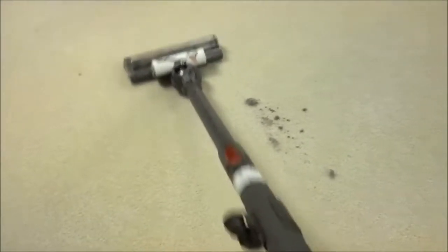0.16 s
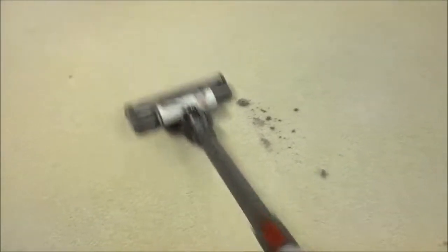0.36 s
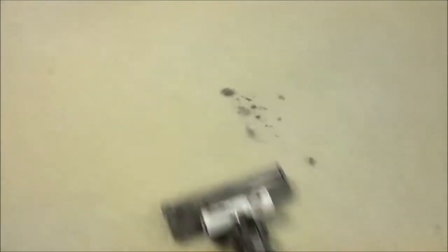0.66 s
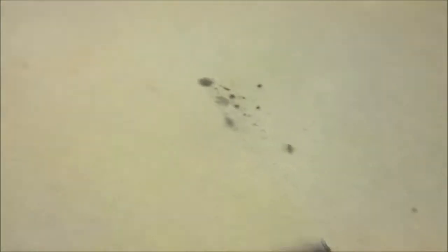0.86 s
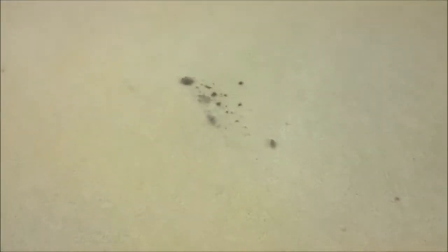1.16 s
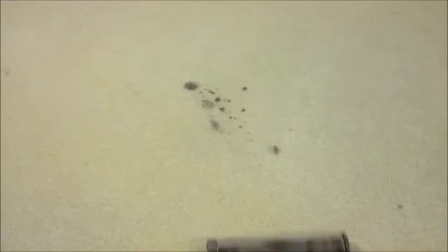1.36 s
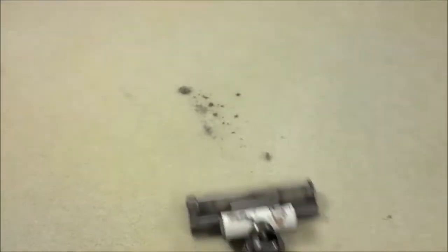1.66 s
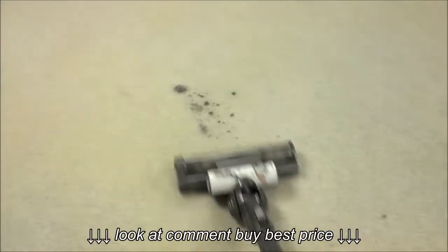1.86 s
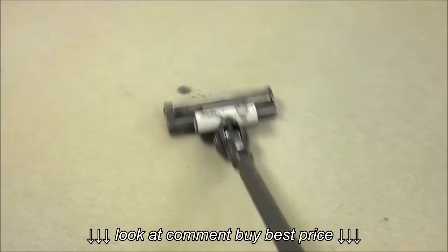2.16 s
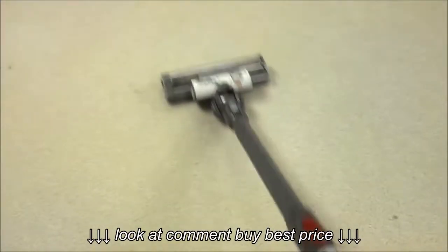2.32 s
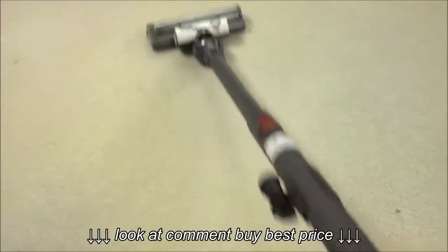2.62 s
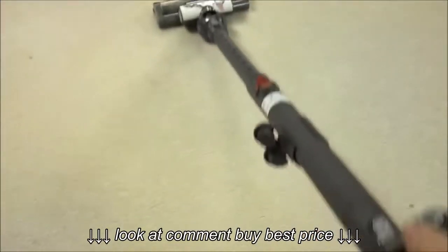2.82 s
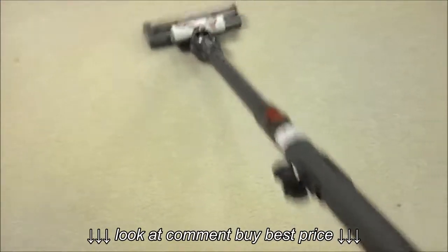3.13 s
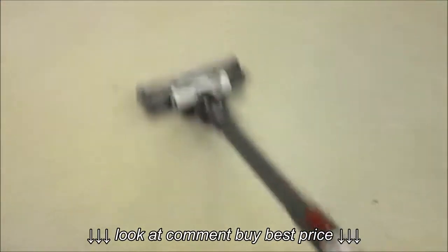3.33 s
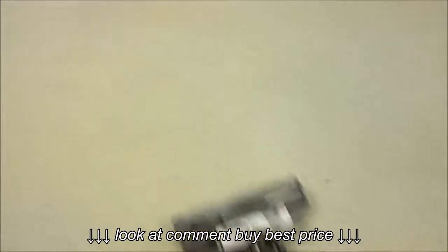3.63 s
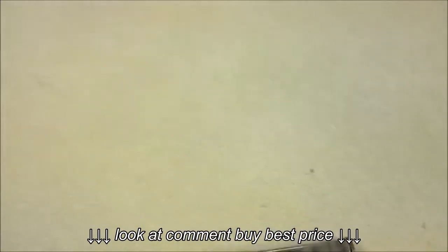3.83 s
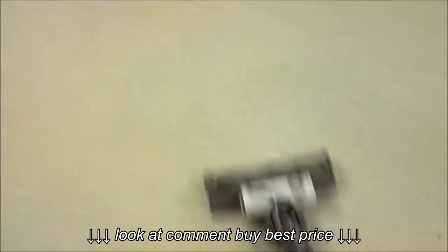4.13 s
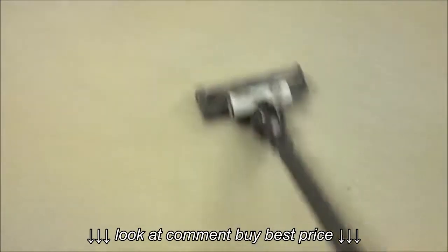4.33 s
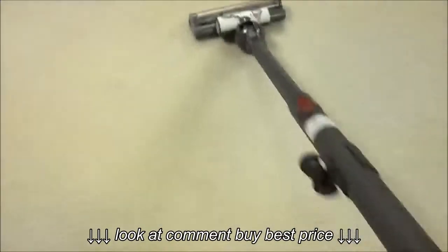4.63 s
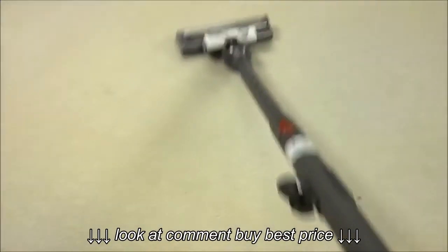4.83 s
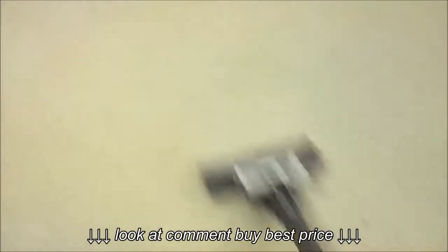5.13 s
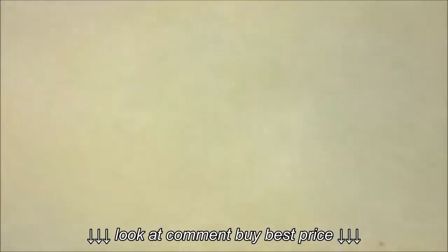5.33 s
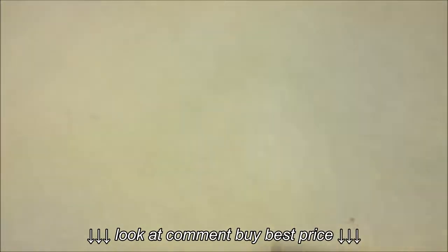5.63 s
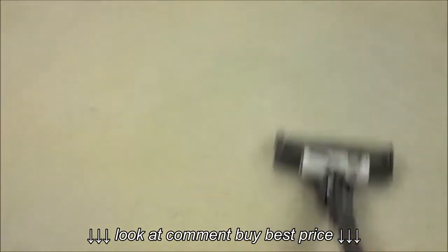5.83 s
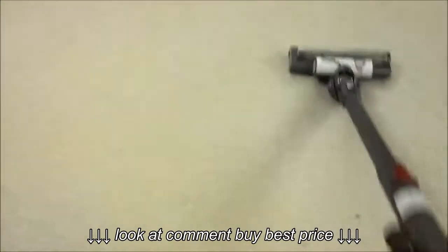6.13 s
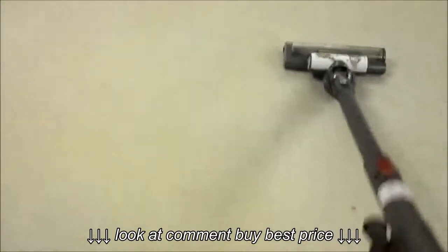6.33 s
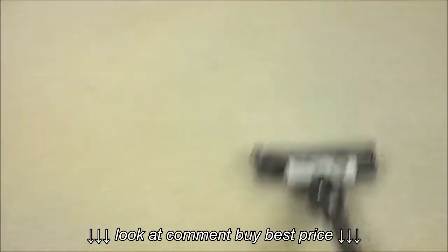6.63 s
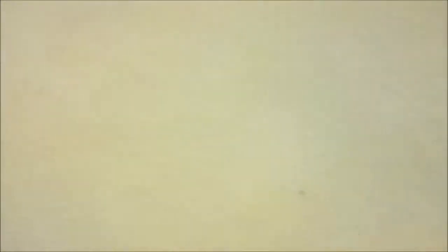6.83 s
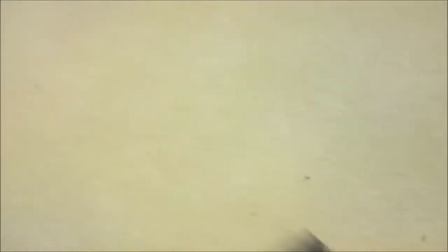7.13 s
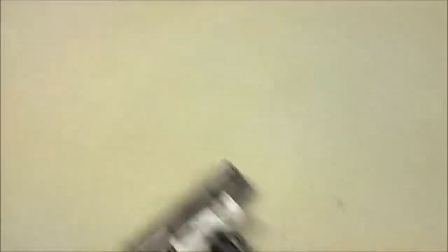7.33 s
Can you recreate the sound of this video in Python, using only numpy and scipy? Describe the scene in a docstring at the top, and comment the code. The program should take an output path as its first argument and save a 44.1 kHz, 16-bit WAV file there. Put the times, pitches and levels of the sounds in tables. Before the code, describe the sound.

Close vacuuming of carpet in a small room: steady airy roar, wavering whistle, a brief rattle of picked-up dirt, and plastic chatter at the end.

```python
"""A canister vacuum cleaner works a carpet in a small room, the floor tool pushed and pulled close to the microphone.
From the start the motor hums and whines in tones, shaped noise rushes and hisses, and a thin whistle glides.
Near 0.2, 3.2 and 6.7 s short side tones of the whistle, sines below or above its main pitch, glide as well.
From 2.1 s crumbs patter and lumps knock in the tool; from 3.0 s grit ticks in the wand: cracks and ringing modes.
At 7.0 s, close to the microphone, the tool chatters on the carpet as it is turned; air and motor run to the end."""
import sys
import numpy as np
from scipy import signal
from scipy.fft import rfft, irfft, next_fast_len
from scipy.io import wavfile
from scipy.ndimage import uniform_filter1d

SR = 44100
rng = np.random.default_rng(int(sys.argv[2]) if len(sys.argv) > 2 else 0)


def master(y):
    """Save y as 16-bit WAV."""
    cut = np.clip(np.atleast_2d(y).T, -1, 1)
    pcm = np.round(cut * 32767)  # scale
    wavfile.write(sys.argv[1], SR, pcm.astype(np.int16))


N = 329427
T = np.arange(N) / SR  # time of each sample [s]

# The arm's strokes: (time [s], distance of the floor tool [0 drawn close, 1 at arm's length])
TOOL_REACH = [(-0.0, 0.85), (0.29, 0.88), (0.74, 0.34), (1.04, 0.17), (1.6, 0.35), (1.95, 0.52),
              (2.34, 0.7), (2.96, 0.97), (3.27, 0.79), (3.6, 0.35), (4.09, 0.24), (4.35, 0.79),
              (4.76, 0.84), (5.09, 0.66), (5.34, 0.2), (5.56, 0.04), (5.67, 0.44), (6.14, 0.81),
              (6.59, 0.69), (6.8, 0.24), (7.02, 0.042), (7.47, 0.39)]
ARM_EASE_S = 0.118  # averaging time that rounds the strokes
PULL_REACH_PER_S = 1  # speed of a brisk pull

# Strength of the suction, before the stroke and each band of air noise shift it: (time [s], level [dB])
SUCTION_LEVEL = [(.05, -34), (.5, -31.5), (.85, -33), (.96, -30.5), (1.08, -33.5), (1.36, -34), (1.75, -33),
                 (2.16, -31.5), (2.96, -35), (3.48, -31), (3.95, -33), (4.14, -36), (4.6, -36),
                 (4.9, -34.5), (5.12, -30.5), (5.33, -32), (5.54, -32.5), (5.74, -35.5), (6.2, -34.5),
                 (6.4, -36.5), (6.64, -33.5), (7.1, -31.5), (7.2, -33.5), (7.45, -34.5)]
# The tool rocks as a stroke turns round and the air noise dips: (time [s], dip [dB], a rise if negative)
STROKE_TURNS = [(.28, 4), (2.78, -0.5), (4.67, 2.5), (6.25, 1.5), (7.12, 1)]
TURN_DROP_S, TURN_RECOVER_S = 0.0054, 0.16  # length of the drop; time constant of the recovery
# The tool clings to the carpet, hardest on the first two pulls, and its wide gap swells:
# (time [s], half length [s], swell [dB])
CARPET_CLINGS = [(.41, 0.28, 5), (3.28, 0.27, 5), (6.2, 0.49, 1)]

# Relative spectra of the low, middle and high air noise: (frequency [Hz], density [dB per Hz])
ROAR_SPECTRUM = [(25, -29), (65, -26), (105, -15.5), (145, -15), (175, -8), (220, -7), (262, -3),
                 (305, -4.5), (370, -0.5), (550, 0.5), (660, -5.5), (1100, -11.5), (3000, -34)]
RUSH_SPECTRUM = [(300, -31), (620, -14), (800, -0.5), (980, -0.5), (1150, 0), (1350, 0.5), (1700, 0.5),
                 (2050, 1), (2350, -2.5), (2600, 1.5), (2900, -8), (3800, -22), (6000, -22)]
EDGE_SPECTRUM = [(1200, -21), (2600, -5.5), (3050, -2), (3500, 2), (4200, 1), (5100, -2), (6500, -3),
                 (7700, -5.5), (10500, -3.5), (11700, -4), (16000, -3.5)]

# Jets in the tool's wide, middle and fine gaps, beaming in lobes that sweep past as the tool travels:
# (centre at the lobe's reach [Hz], width [Hz], level on a lobe with the tool close [dB], reach of that lobe [0-1],
#  reach between lobes [0-1 scale], drop between lobes [dB], rise at arm's length [dB], fall per unit of reach [Hz])
GAP_JETS = [(8905, 2200, -41, 0.75, 1.74, 13.5, 3, 200), (13280, 1850, -37.5, 0.77, 0.75, 10.5, 5, 600),
            (15300, 1400, -35, 0.34, 0.69, 11, 1, 200)]

WAND_CLOSE_DB, WAND_FAR_DB = -36.5, -16.5  # level with the tool drawn close; change at arm's length
DUCT_ECHO_S = .0017  # delay along the duct

# Airflow whistle: (time [s], pitch [Hz], level [dB])
WHISTLE_GLIDE = [(0, 2990, -55), (.2, 2950, -46), (.4, 2880, -53), (.8, 2840, -52), (.95, 2820, -43),
                 (1.12, 2670, -42.5), (1.25, 2730, -44.5), (1.35, 2850, -53), (1.46, 2950, -46),
                 (1.62, 3055, -42.5), (2.1, 3150, -45), (2.38, 3125, -50), (2.6, 3290, -45),
                 (2.98, 3490, -46), (3.15, 3170, -50), (3.42, 2890, -58), (3.65, 2750, -42),
                 (3.88, 2410, -43), (4.01, 2420, -42.5), (4.11, 2790, -44.5), (4.2, 2970, -50),
                 (4.33, 3080, -49.5), (4.45, 3150, -57), (4.74, 3388, -48.5), (4.95, 3178, -49),
                 (5.15, 3030, -46), (5.36, 2880, -45), (5.48, 2420, -42), (5.57, 2400, -41),
                 (5.66, 2650, -44), (5.76, 2872, -49), (6.05, 2950, -57), (6.3, 3098, -52),
                 (6.42, 3098, -43.5), (6.57, 3090, -45), (6.7, 3108, -40.5), (6.98, 3085, -43),
                 (7.1, 3090, -37), (7.2, 3095, -39.5), (7.32, 3260, -51), (7.47, 3350, -62)]
# Its partials: (multiple of the pitch, level [dB], rise per octave of pitch [dB], rise at arm's length [dB])
WHISTLE_PARTIAL_LEVELS = [(.69, -10.5, 10, 0), (1, 0, 0, 0), (2, -18, 10, 12)]
WHISTLE_JITTER = .0034  # share of the pitch, at the mean pitch
WHISTLE_FLUTTER_DB, WHISTLE_FLUTTER_HZ = 2, 130  # depth and rate of the level's flutter
WHISTLE_ROOM_DB = -15  # echo in the room, relative to the direct whistle

# The whistle's shrill mode flares up as the tool is pulled back: (time [s], half length [s], swell [dB])
SHRILL_SWELLS = [(.75, .35, 6), (3.45, .17, 9), (3.88, .15, 6), (5.32, .22, 8.5)]
SHRILL_RATIO, SHRILL_WIDTH_HZ = 3.655, 110  # multiple of the whistle's pitch; line width
SHRILL_DB = -54  # resting level
SHRILL_CEILING_HZ, SHRILL_FADE_HZ = 11500, 250  # where it dies out, and how gradually

SHAFT_HZ, SHAFT_DB = 585.2, -54.5  # mean pitch and level of the motor shaft
FAN_BLADES = 11
MAINS_HZ, HUM_DB = 60, -66
# Whine of the fan blades, before it wavers: (time [s], level [dB])
FAN_WHINE = [(0, -60), (3.3, -62), (3.8, -48), (4.3, -61), (4.8, -48.5), (5.4, -56), (6.05, -53),
             (6.4, -65), (7.47, -61)]

# Short side tones of the airflow whistle, below or above its main pitch:
# (time [s], length [s], first pitch [Hz], last pitch [Hz], level at the middle [dB])
SIDE_TONE_GLIDES = [(.22, .45, 2050, 1980, -46), (3.18, .14, 1720, 2080, -42),
                    (3.2, .24, 3480, 3830, -43.5), (3.47, .14, 3620, 3560, -46),
                    (6.66, .16, 2150, 2130, -45)]

# Modes of the plastic tool and wand, before chance scatters their levels:
# (frequency [Hz], time to fall 60 dB [s], level [dB])
PLASTIC_MODES = [(270, .045, -2), (400, .03, 1), (550, .02, -4), (760, .025, -2), (1150, .015, -4),
                 (1900, .012, -11), (3300, .008, -6), (4700, .006, -5), (5800, .006, -6)]
CRACK_S, CRACK_DB = .002, 0  # time constant of a crack; its peak relative to the ring

# The patch of crumbs: when the tool meets it, and the time to cross it
CRUMBS_FROM_S, CRUMBS_LENGTH_S = 2.08, .4
CRUMBS_DB, CRUMBS_SPREAD_DB = -32, 8  # loudest peak; spread below that
CRUMBS_HZ = 400  # softest contact pitch

# Peaks of the three tables below are before the plastic body's bass cut and the room.
# Lumps of dirt hitting the tool: (time [s], peak [dB], contact pitch, higher for a harder lump [Hz])
DIRT_LUMPS = [(2.1732, -22.5, 480), (2.1755, -28, 600), (2.191, -28, 900), (2.292, -26, 600),
              (2.296, -28, 550), (2.315, -31, 600), (2.381, -30, 650), (2.476, -20.5, 900),
              (2.4785, -25, 900), (2.4827, -17, 390)]
# Grit hitting the wand, before a common cut in scene(): (time [s], peak [dB], contact pitch [Hz])
WAND_GRIT = [(3.0294, -32, 4030), (3.5635, -15, 4460), (3.8884, -17, 3980), (3.933, -14, 2400),
             (5.128, -16, 3980), (5.3238, -30, 4000), (5.3617, -27, 3950), (6.9304, -17, 4550)]
# The tool chatters on the carpet as it is turned: (time [s], peak [dB], contact pitch [Hz])
TOOL_CHATTER = [(7.0166, -22, 4500), (7.034, -24, 4300), (7.0515, -22, 4500), (7.0869, -20.5, 4300),
                (7.1049, -18.5, 3800), (7.114, -24, 3200)]

ROOM_DB, ROOM_T60_S = -16, .2  # level of the blows' room tail; its time to fall 60 dB
TOP_HZ = 15720  # upper edge of the recorder's band


def undb(db):
    """Decibels to gain."""
    return 10 ** (np.asarray(db) / 20)


def curves(table):
    """The columns of a table as one value per sample."""
    s, *columns = np.transpose(table)
    return [np.interp(T, s, column) for column in columns]


def walk(hz):
    """Slow chance: random levels held and slewed twice, spread near 1."""
    hold = max(int(SR / hz), 2)
    steps = np.repeat(rng.standard_normal(N // hold + 1), hold)
    return 1.3 * uniform_filter1d(uniform_filter1d(steps, hold), hold)[:N]


def swells(table):
    """Decibels gained in smooth bell-shaped swells."""
    return sum(db * np.exp(-((T - s) / half_s) ** 2) for s, half_s, db in table)


def noise(gain_at):
    """Noise of rms 1 with the given gain over frequency."""
    size = next_fast_len(N, True)
    f = np.maximum(np.arange(size // 2 + 1) * SR / size, 1)
    x = irfft(rfft(rng.standard_normal(size)) * gain_at(f), size)[:N]
    return x / x.std()


def turbulence(spectrum):
    """Air noise of rms 1 that follows a spectrum, dying away beyond its ends."""
    hz, db = np.transpose(spectrum)

    def gain_at(f):
        ends = np.minimum(f / hz[0], 1) * np.minimum(hz[-1] / f, 1) ** 2
        return undb(np.interp(np.log(f), np.log(hz), db)) * ends

    return noise(gain_at)


def resonance(hz, width_hz):
    """Air noise ringing in one steep resonance, whose centre may move."""
    phase = 2 * np.pi * np.cumsum(np.broadcast_to(hz, N)) / SR

    def skirt(f):
        return np.exp(-(f / (2 * width_hz)) ** 4) / (1 + (2 * f / width_hz) ** 2)

    # two slow noises on carriers a quarter turn apart
    return noise(skirt) * np.cos(phase) + noise(skirt) * np.sin(phase)


def tone(hz):
    """A sine of rms 1 that follows a pitch curve."""
    return np.sqrt(2) * np.sin(2 * np.pi * (np.cumsum(hz) / SR + rng.random()))


def room(x, wet_db):
    """A short, dense tail of decaying noise from a carpeted room, added to the direct sound."""
    t = T[:SR // 3]
    tail = rng.standard_normal(len(t)) * np.exp(-np.log(1000) * t / ROOM_T60_S)
    tail *= t > .006  # the first reflections arrive late
    return x + undb(wet_db) * signal.fftconvolve(x, tail / np.linalg.norm(tail))[:N]


def suction(flow_db, cling_db, reach, roar_db=-10.0, rush_db=-3.0, edge_db=-3.0, edge_cling=0.38,
            far_db=2.5, flutter_db=0.87, roar_flutter_db=0.8):
    """Broad air noise, a little stronger with the tool flat at arm's length; the brush strip makes it flutter."""
    flutter = flutter_db * walk(45)
    level_db = flow_db + far_db * reach
    low = turbulence(ROAR_SPECTRUM) * undb(level_db + roar_db + roar_flutter_db * walk(9))
    middle = turbulence(RUSH_SPECTRUM) * undb(level_db + rush_db + flutter)
    high = turbulence(EDGE_SPECTRUM) * undb(level_db + edge_db + edge_cling * cling_db + flutter)
    return low + middle + high


def jets(reach, pull, surge_db, cling_db, flicker_db=1.36, surge_share=0.46, wide_pull_db=3.0,
         cling_steal=1.0, sag_hz_per_db=60, wander=.007):
    """Each gap hisses in its own resonance, loudest when one of its lobes points at the microphone."""
    gaps = []
    # clinging to the carpet lowers the wide gap's resonance
    sags_hz = (sag_hz_per_db * cling_db, 0, 0)
    for gap, sag_hz in zip(GAP_JETS, sags_hz):
        hz, width_hz, db, lobe, spacing, depth_db, far_db, far_hz = gap
        beam_db = far_db * reach - depth_db * np.sin(np.pi * (reach - lobe) / spacing) ** 2
        centre_hz = hz * (1 + wander * walk(5)) - sag_hz - far_hz * (reach - lobe)
        level_db = db + beam_db + surge_share * surge_db + flicker_db * walk(30)
        gaps.append(resonance(centre_hz, width_hz) * undb(level_db))
    wide, middle, fine = gaps
    # pulling and clinging send more of the air through the wide gap
    return wide * undb(cling_db + wide_pull_db * pull) + middle * undb(-cling_steal * cling_db) + fine


def wand(reach, surge_db, hz=3130, follow=.45, width_hz=1150, surge_share=1.2):
    """Air rings in the wand's bore, loudest drawn close; the resonance leans with the whistle's pitch."""
    pitch = curves(WHISTLE_GLIDE)[0]
    centre_hz = hz + follow * (pitch - pitch.mean())
    level_db = WAND_CLOSE_DB + WAND_FAR_DB * reach + surge_share * surge_db
    return resonance(centre_hz, width_hz) * undb(level_db)


def duct(x, echo_db=-20):
    """A weak echo along a short duct gives the rush a faintly hollow colour."""
    lag = round(DUCT_ECHO_S * SR)
    return x + undb(echo_db) * np.pad(x, (lag, 0))[:N]


def whistle(reach):
    """Vortices shed in the air path sing at a pitch that follows the flow; turbulence blurs and flutters it."""
    pitch, db = curves(WHISTLE_GLIDE)
    octaves = np.log2(pitch / pitch.mean())
    # a choked flow sings lower, duller and less cleanly
    hz = pitch * (1 + WHISTLE_JITTER * 2 ** (-5 * octaves) * walk(300))
    low = np.zeros(N)
    for multiple, part_db, rise_db, far_db in WHISTLE_PARTIAL_LEVELS:
        flutter_db = WHISTLE_FLUTTER_DB * walk(WHISTLE_FLUTTER_HZ)
        low += tone(multiple * hz) * undb(db + part_db + rise_db * octaves + far_db * reach + flutter_db)
    # a shrill upper mode flares up on the pulls, and dies out above its ceiling
    shrill_hz = SHRILL_RATIO * pitch
    speaks = .5 + .5 * np.tanh((SHRILL_CEILING_HZ - shrill_hz) / SHRILL_FADE_HZ)
    shrill = speaks * resonance(shrill_hz, SHRILL_WIDTH_HZ) * undb(SHRILL_DB + swells(SHRILL_SWELLS))
    return room(low + shrill, WHISTLE_ROOM_DB)


def motor(drift=.0015, jitter=0.002, waver_db=3):
    """Shaft and blade tones fade in and out with the room's standing waves, over a hum at twice the mains rate."""
    hz = SHAFT_HZ * (1 + drift * walk(1.5) + jitter * walk(120))
    shaft = tone(hz) * undb(SHAFT_DB + waver_db * walk(8.2))
    blades = tone(FAN_BLADES * hz) * undb(curves(FAN_WHINE)[0] + waver_db * walk(6.4))
    hum = tone(np.full(N, 2 * MAINS_HZ)) * undb(HUM_DB + 0.89 * walk(2.68))
    return shaft + blades + hum


def side_tones(jitter=0.012):
    """Short side tones of the airflow whistle, each a jittery sine that glides, swells and fades."""
    out = np.zeros(N)
    for s, length_s, first_hz, last_hz, db in SIDE_TONE_GLIDES:
        along = np.clip((T - s) / length_s, 0, 1)
        hz = (first_hz + (last_hz - first_hz) * along) * (1 + jitter * walk(250))
        out += tone(hz) * np.sin(np.pi * along) ** .5 * undb(db)
    return out


def turn_dips():
    """Decibels lost as the tool rocks at a turn: a sudden drop, then a short recovery."""
    dips = np.zeros(N)
    for s, db in STROKE_TURNS:
        drop = np.clip((T - s) / TURN_DROP_S, 0, 1)
        dips += db * drop * np.exp(-np.maximum(T - s, 0) / TURN_RECOVER_S)
    return dips


def knocks(table, scatter_db=3):
    """Each blow cracks and rings the plastic modes; the contact time decides which of them take the energy."""
    out, t = np.zeros(N + SR), T[:SR // 8]
    hz, t60, db = np.transpose(PLASTIC_MODES)[:, :, None]
    rings = np.sin(2 * np.pi * hz * t) * np.exp(-np.log(1000) * t / t60)
    for s, peak_db, contact_hz in table:
        # modes near the contact pitch ring most
        contact = 1 / (hz / contact_hz + contact_hz / hz) ** 2
        mode_gain = undb(db + scatter_db * rng.standard_normal(hz.shape))
        ring = np.sum(rings * contact * mode_gain, axis=0)
        edges_hz = [contact_hz / 2, contact_hz * np.sqrt(2)]
        band = signal.butter(1, edges_hz, "band", fs=SR, output="sos")
        burst = rng.standard_normal(len(t)) * np.exp(-t / CRACK_S)
        crack = signal.sosfilt(np.tile(band, (2, 1)), burst)  # the band-pass twice over
        blow = ring / np.abs(ring).max() + undb(CRACK_DB) * crack / np.abs(crack).max()
        start = int(s * SR)
        out[start:start + len(t)] += blow / np.abs(blow).max() * undb(peak_db)
    return out[:N]


def crumbs(count=26):
    """Small crumbs patter softly in the tool, as weak random blows while it crosses the patch of dirt."""
    when, strength, hardness = rng.random((count, 3)).T
    times = CRUMBS_FROM_S + CRUMBS_LENGTH_S * when
    peaks_db = CRUMBS_DB - CRUMBS_SPREAD_DB * strength
    return knocks(zip(times, peaks_db, CRUMBS_HZ * 2 ** hardness))


def scene(grit_db=-6):
    """Air, motor and dirt, heard in mono; the tool's reach and the suction drive the broad air noises."""
    reach = uniform_filter1d(curves(TOOL_REACH)[0], int(ARM_EASE_S * SR), mode="nearest")
    pull_speed = np.maximum(-np.gradient(reach, T), 0)
    pull = np.tanh(pull_speed / PULL_REACH_PER_S)
    flow_db = curves(SUCTION_LEVEL)[0] - turn_dips()
    cling_db = swells(CARPET_CLINGS)
    surge_db = flow_db - flow_db.mean()
    air = suction(flow_db, cling_db, reach) + jets(reach, pull, surge_db, cling_db) + wand(reach, surge_db)
    blows = crumbs() + knocks(DIRT_LUMPS) + undb(grit_db) * knocks(WAND_GRIT) + knocks(TOOL_CHATTER)
    # the small plastic body radiates no deep bass
    blows = signal.sosfilt(signal.butter(3, 210, "high", fs=SR, output="sos"), blows)
    mono = duct(air) + whistle(reach) + motor() + side_tones() + room(blows, ROOM_DB)
    return np.array([mono, mono])


def record(dry):
    """The recorder cuts the top steeply, with an elliptic low-pass."""
    return signal.sosfilt(signal.ellip(12, .1, 80, TOP_HZ, fs=SR, output="sos"), dry)


dry = scene()
out = record(dry)
master(out)
```